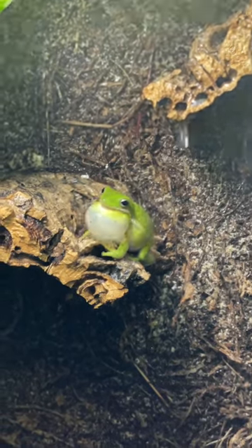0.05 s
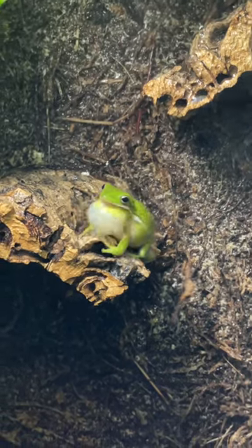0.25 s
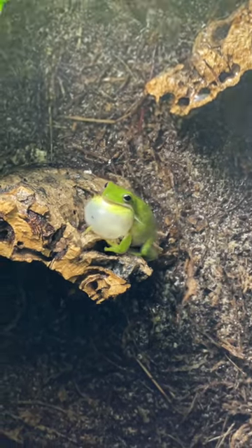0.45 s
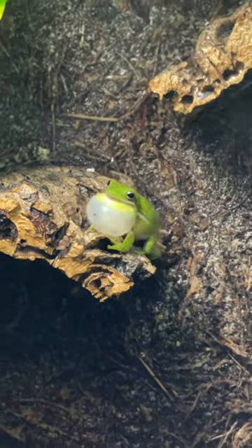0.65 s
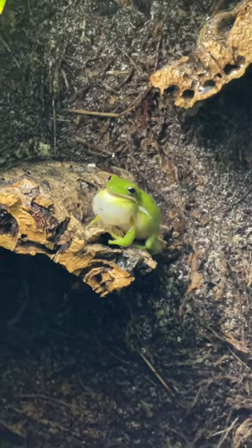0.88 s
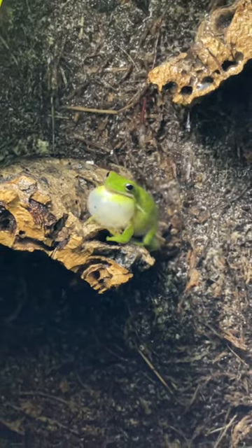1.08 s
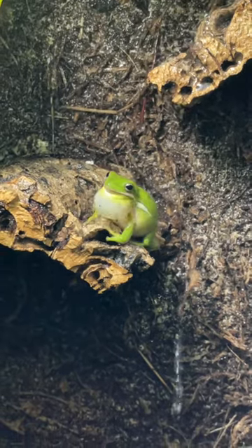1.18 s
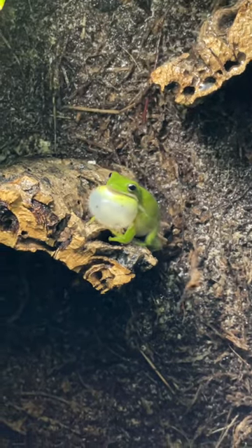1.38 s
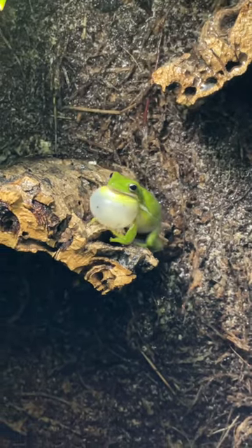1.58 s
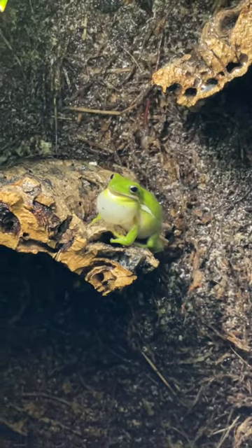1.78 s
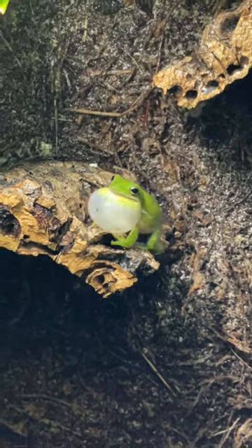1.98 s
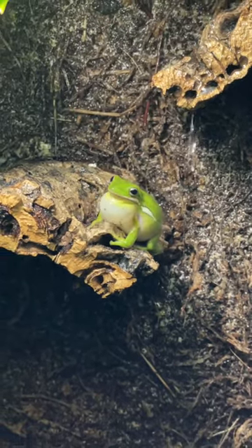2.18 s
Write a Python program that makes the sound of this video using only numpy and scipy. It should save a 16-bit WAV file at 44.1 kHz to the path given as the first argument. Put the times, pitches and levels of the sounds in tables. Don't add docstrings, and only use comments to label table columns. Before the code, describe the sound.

Close stereo pickup of one small frog in a glass tank: six evenly spaced, buzzy, quacking croaks with short hard reflections and a faint room tail, a fading sprayer hiss at first, another soon after, low hum beneath.

```python
import sys
import numpy as np
from scipy import signal
from scipy.fft import rfft, irfft
from scipy.io import wavfile
from scipy.ndimage import uniform_filter1d, minimum_filter1d

SR = 44100
rng = np.random.default_rng(int(sys.argv[2]) if len(sys.argv) > 2 else 0)


def dump(signal):
    limited = np.clip(np.atleast_2d(signal).T, -1, 1)
    pcm = np.round(limited * 32767).astype(np.int16)
    wavfile.write(sys.argv[1], SR, pcm)


def boost(x):
    u = np.asarray(x, float) / 20
    return 10 ** u


N = 99225

# (start [s], beat pace [ratio], sac tone [dB], tone between beats [dB], lead-in before start [s])
CROAKS = [
    (0.222, 1, -24, -17, .013),
    (0.567, .98, -12, -28, .011),
    (0.874, .98, -12, -28, .011),
    (1.186, 1.01, -12, -30, .013),
    (1.510, 1.01, -12, -29, .011),
    (1.869, 1.05, -12, -30, .010),
]
# (time [s], level [dB])
EFFORT = [
    [(0.224, -26), (0.276, -14.5), (0.288, -20.5), (0.316, -22), (0.364, -39.5), (0.37, -44.5)],
    [(0.569, -22), (0.617, -15.5), (0.697, -27.5), (0.705, -39.5)],
    [(0.876, -21), (0.882, -14.5), (0.888, -27.5), (0.902, -10), (0.916, -28), (0.926, -11), (0.946, -27.5),
     (0.956, -20), (1.0, -33.5)],
    [(1.188, -20), (1.198, -20.5), (1.206, -34), (1.214, -18), (1.248, -16), (1.298, -19.5), (1.318, -38.5),
     (1.325, -33)],
    [(1.512, -18), (1.528, -27), (1.54, -13), (1.552, -19.5), (1.562, -16), (1.602, -20.5), (1.612, -16.5),
     (1.65, -31), (1.66, -44)],
    [(1.871, -24), (1.881, -16), (1.889, -35), (1.901, -15), (1.939, -17), (1.993, -22), (2.02, -48)],
]
# (frequency [Hz], width [Hz], level [dB], share of the throb [ratio])
BODY = [(1027, 70, -7.5, 1.2), (1379, 160, -12.5, 0.54), (1450, 88, -23, 1.7), (1902, 354, 1.5, 0.47),
        (2308, 51, -14, 0.24), (2493, 100, -1, 0.47), (2781, 82.6, -2.5, 0.093), (3240, 290, -8, 0.26),
        (3748, 230, -6.5, 0.93), (3834, 71, -19, 0.38), (4664, 200, -13, 0.81), (5670, 310, -10, .4),
        (5983, 220, -10, 0.76), (7780, 700, -25.5, 1.5)]


def rasp(t):
    slap_hz, slap_jitter, slap_spread_db, mode_spread_db = 255, 0.16, 2.5, 2.5
    onset_s, throb_db = 0.0066, 7
    effort, throb, lead, sheen_hz = 0, 0, 0, 0
    for push, (start, pace, db, between_db, early) in zip(EFFORT, CROAKS):
        u = t - start
        inside = (u > -0.02) & (u < 0.16)
        pushed = boost(np.interp(t, *np.transpose(push), right=-120))
        effort = effort + pushed * np.clip(u / onset_s, 0, 1)
        depth_db = np.clip(db - between_db, 0, throb_db)
        throb = throb - inside * depth_db * (1 - np.abs(beats(u, pace)))
        lead = lead + (u > -early) * boost(-31 - 60 * np.clip(u + early, 0, 1) / 0.034)
        sheen_hz = sheen_hz + inside * (15300 - 19000 * u)
    for start, length, _, _, _ in WHINES:
        whining = np.clip((t - start) / WHINE_EDGE_S, 0, 1) * (t < start + length)
        effort = effort * (1 - 0.7 * whining)

    draws = rng.standard_normal((800, 20))
    slap_s = np.cumsum(np.exp(slap_jitter * draws[:, 0])) / slap_hz
    heard = slap_s < t[-1]
    at = (slap_s[heard] * SR).astype(int)
    draws = np.clip(draws[heard], -2, 1.5)
    air = rng.standard_normal(N) * np.sqrt(slap_hz / SR)
    rung = []
    for k, (hz, width_hz, db, share) in enumerate(BODY):
        slaps = boost(-11) * air
        slaps[at] += boost(slap_spread_db * draws[:, 1] + mode_spread_db * draws[:, 2 + k])
        drive = slaps * effort * boost(share * throb) + lead * air * (hz < 3300)
        rung.append((-1) ** k * boost(db) * resonate(drive, hz, width_hz))

    body = signal.sosfilt(signal.butter(4, 772, "high", fs=SR, output="sos"), sum(rung[:-1]))
    body = signal.sosfilt(signal.cheby1(6, 1, 6860, fs=SR, output="sos"), body)
    body = body + band(rung[-1], 5600, 8400)
    sheen = np.sin(2 * np.pi * np.cumsum(sheen_hz) / SR)
    sheen = boost(-38) * drift(500) * sheen * effort * boost(throb)
    thump = boost(-60) * rms_one(band(air, 210, 450)) * np.sqrt(effort)
    edge = boost(-42) * rms_one(band(air, 7000, 13500)) * effort
    return boost(-2.43) * 2.54 * body + band(sheen, 12000, 16000) + thump, edge


# (multiple [ratio], level [dB])
SAC_TONES = [(1, 0), (2, -10), (4, -24), (6, -17)]


def sac(t):
    phase = 2 * np.pi * np.cumsum(1030 * (1 + 0.008 * drift(40))) / SR
    tone = sum(boost(db) * np.sin(k * phase + k) for k, db in SAC_TONES)
    shape, flutter = 0, boost(2 * drift(110))
    rise_s, end_s, fall_s = 0.0069, 0.105, 0.028
    for start, pace, db, between_db, _ in CROAKS:
        held = np.clip(np.minimum((t - start) / rise_s, (start + end_s - t) / fall_s + 1), 0, 1)
        shape = shape + boost(db) * beats(t - start, pace) + boost(between_db) * held * flutter
    return shape * tone


# (time after start [s], width [s], level [dB])
BEATS = [
    (.008, .003, -4),
    (.030, .0038, 0),
    (.054, .0045, -2),
    (.084, .005, -5),
]


def beats(u, pace):
    swells = 0
    for k, (at, wide, db) in enumerate(BEATS):
        swells = swells + (-1) ** k * boost(db) * np.exp(-0.5 * ((u - at * pace) / wide) ** 2)
    return swells


# (start [s], length [s], first pitch [Hz], last pitch [Hz], level [dB])
WHINES = [
    (0.331, 0.032, 1030, 956, -30),
    (0.676, 0.027, 1088, 983, -24.5),
    (0.959, 0.025, 1071, 984, -26),
    (1.292, 0.029, 1058, 964, -28.5),
    (1.623, .026, 1100, 925, -23),
    (1.975, .03, 992, 964, -28.5),
]
# (multiple [ratio], level [dB])
WHINE_TONES = [(1, .1), (2, -9), (3, -7), (4, -17), (5, -28), (6, -16), (7, -45), (13, -38), (14, -42)]
WHINE_EDGE_S = 0.005


def whine(t):
    out = np.zeros(N)
    overtone_db = 5.24 - 1.5 * drift(40)
    for start, length, first_hz, last_hz, db in WHINES:
        u = np.clip((t - start) / length, 0, 1)
        phase = 2 * np.pi * np.cumsum(first_hz + (last_hz - first_hz) * u ** 1.1) / SR
        fade = np.minimum(t - start, 0.5 * (start + length - t))
        shape = np.clip(fade / WHINE_EDGE_S, 0, 1) ** 2
        for k, tone_db in WHINE_TONES:
            level = boost(db + 2 + tone_db + (k > 1) * overtone_db)
            out += shape * level * np.sin(k * phase + k * k)
    return out


# (frequency [Hz], share [ratio])
PORTS = [(690, -.4), (1030, -0.2), (1400, -0.5), (2400, 0.35), (4100, .2), (4800, 0.9), (5300, 0),
         (6400, 0.8)]


def space(x, edge):
    tank_t60_s, room_t60_s = 0.058, 0.46
    t = np.arange(SR) / SR
    tank = rng.standard_normal(SR) * boost(-60 * t / tank_t60_s) * (t > 0.001)
    walls = [(300, 0), (5900, -3), (16000, -25)]  # (frequency [Hz], level [dB])
    room = stereo(coloured(walls), 0.42 * coloured(walls))[:, :SR]
    room = room * boost(-60 * t / room_t60_s) * (t > 0.008)
    near = x + boost(-12) * signal.fftconvolve(x, rms_one(tank) / np.sqrt(SR))[:N]
    side = irfft(rfft(near) * 1j * at_hz(PORTS, np.fft.rfftfreq(N, 1 / SR)), N)
    tail = signal.fftconvolve(x[None], rms_one(room) / np.sqrt(SR), axes=1)[:, :N]
    return stereo(near, side + edge) + boost(-30) * tail


# (time [s], level [dB])
MIST = [(0, -39.5), (.06, -46.5), (.08, -54), (.15, -62.5), (.19, -80.5), (.33, -65.5), (.38, -47),
        (.44, -41), (.48, -43), (.51, -49.5), (.55, -63.5), (.62, -84.5)]
# (frequency [Hz], level [dB])
MIST_COLOUR = [(200, -20), (2000, -7.5), (8200, -11.5), (8800, -53), (11700, -47), (12600, -9),
               (15700, -10.5), (16100, -51)]
# (frequency [Hz], level [dB])
MIST_SIDE = [(120, -60.5), (200, -31.5), (1000, -8.5), (1770, -13), (2090, -56.5), (4680, -18.5),
             (10900, -6), (13800, -18.5), (16000, -78.5)]


def mist(t):
    puffs = boost(np.interp(t, *np.transpose(MIST)) + 0.89 * drift(25))
    return puffs * stereo(coloured(MIST_COLOUR), boost(-2) * coloured(MIST_SIDE))


# (frequency [Hz], level [dB])
HUM = [(60, -73), (80, -76.5), (120, -57)]


def hum(t):
    tones = 0
    for hz, db in HUM:
        tones = tones + np.sqrt(2) * boost(db + 1.6 * drift(6)) * np.sin(2 * np.pi * hz * t)
    return tones


# (frequency [Hz], level per Hz [dB])
FLOOR = [(25, -16.5), (60, -1.5), (130, -7.5), (200, -23), (500, -21.5), (1000, -19.5), (3000, -34.5),
         (6000, -58)]


def room_floor():
    sides = [(100, -63.5)] + FLOOR[3:]
    return boost(-62) * stereo(coloured(FLOOR), boost(-28) * coloured(sides))


def rms_one(x):
    return x / np.sqrt(np.mean(x ** 2) + 1e-20)


def at_hz(points, hz):
    table_hz, values = np.array(points).T
    return np.interp(np.log(np.maximum(hz, 1)), np.log(table_hz), values)


def drift(rate_hz):
    r = np.exp(-2 * np.pi * rate_hz / SR)
    return rms_one(signal.lfilter([1], [1, -2 * r, r * r], rng.standard_normal(N + SR))[SR:])


def resonate(x, hz, width_hz):
    r, w = np.exp(-np.pi * width_hz / SR), 2 * np.pi * hz / SR
    return signal.lfilter([0, np.sin(w)], [1, -2 * r * np.cos(w), r * r], x + 1e-18)


def coloured(points):
    spectrum = rfft(rng.standard_normal(N))
    return rms_one(irfft(spectrum * boost(at_hz(points, np.fft.rfftfreq(N, 1 / SR))), N))


def stereo(mid, side):
    return np.array([mid + side, mid - side])


def band(x, low_hz, high_hz):
    return signal.sosfilt(signal.butter(3, [low_hz, high_hz], "band", fs=SR, output="sos"), x)


def scene():
    t = np.arange(N) / SR
    voice, edge = rasp(t)
    frog = space(voice + sac(t) + whine(t), edge)
    return frog + mist(t) + hum(t) + room_floor()


def top_cut(x):
    return signal.sosfilt(signal.butter(12, 16800, fs=SR, output="sos"), x)


def record(dry):
    ceiling = 0.88
    gain = minimum_filter1d(ceiling / np.maximum(np.abs(dry).max(axis=0), ceiling), size=181)
    gain = uniform_filter1d(uniform_filter1d(gain, size=90), size=90)
    return top_cut(dry * gain)


dry = scene()
out = record(dry)
dump(out)
```